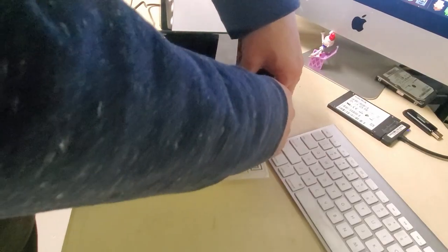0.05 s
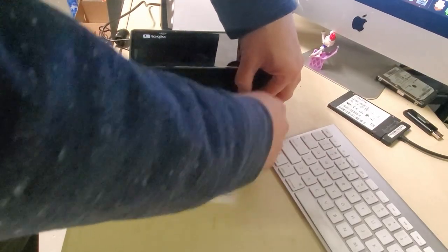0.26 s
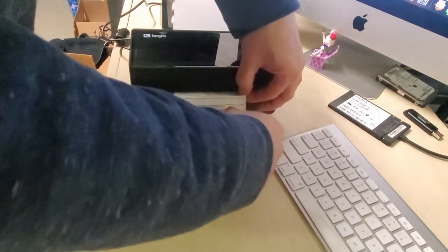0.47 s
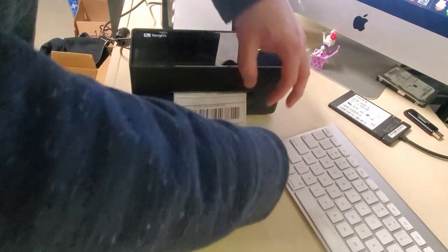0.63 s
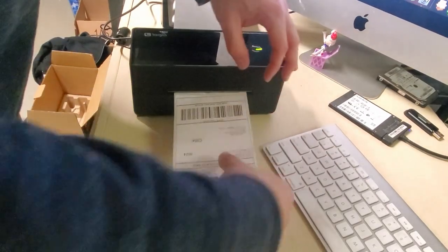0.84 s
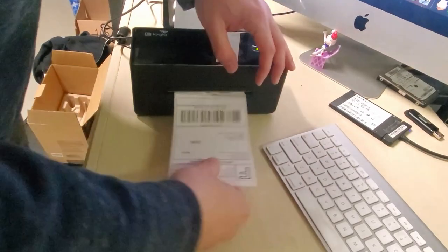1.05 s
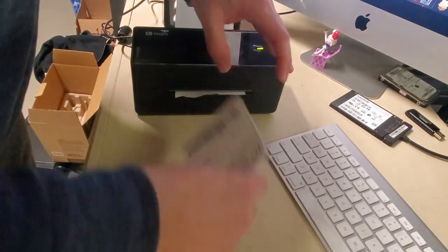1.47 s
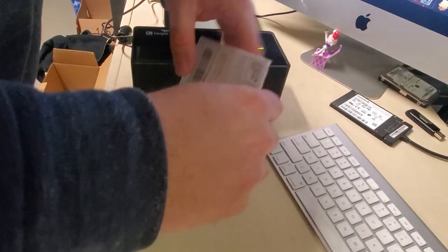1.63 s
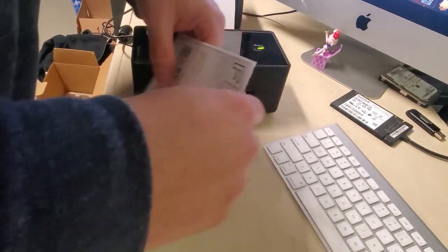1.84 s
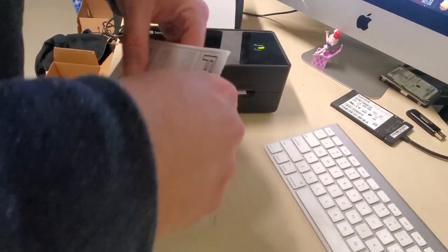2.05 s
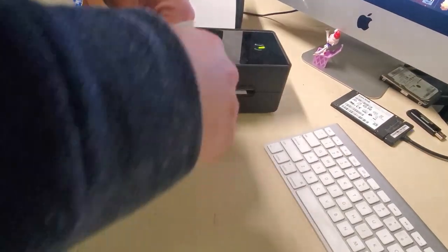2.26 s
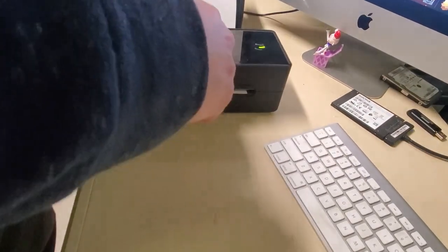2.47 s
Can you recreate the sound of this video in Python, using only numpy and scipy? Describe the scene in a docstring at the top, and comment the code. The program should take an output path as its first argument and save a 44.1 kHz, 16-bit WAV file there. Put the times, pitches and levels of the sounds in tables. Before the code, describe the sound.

A paper label rips off a desk printer, then crinkles and tears free with light knocks.

```python
"""A small office, the microphone close to a desk printer as a paper label is torn off.
The perforation gives way in a quick run of snaps and a short rip of parting fibres; the sheet is
pulled taut, ticks as it buckles, and the last strip rips free. Fingers bump the hollow housing,
the printer rocks, and the paper slides and crinkles as it is lifted, over a faint ventilation hum."""
import sys
import numpy as np
from scipy import signal
from scipy.fft import rfft, irfft
from scipy.io import wavfile

SR = 44100
rng = np.random.default_rng(int(sys.argv[2]) if len(sys.argv) > 2 else 0)


def transcribe(signal):
    """Save signal, clipped to [-1, 1], as a 16-bit WAV file at the path in sys.argv[1]."""
    frames = np.atleast_2d(signal).T
    limited = np.clip(frames, -1, 1)
    pcm = np.round(limited * 32767).astype(np.int16)
    wavfile.write(sys.argv[1], SR, pcm)


N = 110250
T = np.arange(N) / SR


def amp(db):
    """Decibels to gain."""
    return 10 ** (np.asarray(db) / 20)


def unit_rms(x):
    """Scale to rms 1."""
    return x / np.sqrt(np.mean(x ** 2))


def unit_energy(x):
    """Scale each channel to energy 1."""
    return x / np.linalg.norm(x, axis=-1, keepdims=True)


def value_at(points, hz):
    """Value of a table on a log-frequency axis."""
    freqs, values = np.array(sorted(points)).T
    return np.interp(np.log(np.maximum(hz, 1)), np.log(freqs), values)


def convolve(x, response):
    """Play x through a response."""
    return signal.fftconvolve(np.atleast_2d(x), np.atleast_2d(response), axes=-1)[:, :N]


def strike(x, response):
    """Ring a response with unit power gain."""
    return convolve(x, unit_energy(response))


def colour(x, spectrum, size=8192):
    """Minimum-phase filter with the given spectrum and unit power gain."""
    cepstrum = irfft(np.log(amp(value_at(spectrum, np.fft.rfftfreq(size, 1 / SR)))))
    cepstrum[1:size // 2] *= 2
    cepstrum[size // 2 + 1:] = 0
    return strike(x, irfft(np.exp(rfft(cepstrum))))


def decay(t, t60):
    """Fall by 60 dB in t60 seconds."""
    return np.exp(-np.log(1000) * t / t60)


def mode(hz, t60):
    """A dying ring."""
    t = T[:SR // 8]
    return np.cos(2 * np.pi * hz * t) * decay(t, t60)


def clicks(times, db):
    """Impulses, each with the energy of one millisecond at its level."""
    out = np.zeros(N)
    np.add.at(out, np.clip((times * SR).astype(int), 0, N - 1), amp(db) * np.sqrt(SR / 1000))
    return out


def grains(per_s, spread_db):
    """Dense random clicks of uneven size, rms 1."""
    fires = rng.random(N) < per_s / SR
    size = np.minimum(rng.exponential(size=N), 4)
    sign = rng.choice([-1, 1], N)
    return unit_rms(fires * sign * amp(spread_db * size))


def swells(rows):
    """Bell-shaped rises and falls in level."""
    return sum(amp(db) * np.exp(-((T - at) / half) ** 2 / 2) for at, half, db in rows)


def pan(db):
    """Channel gains that put the left db above the right."""
    return amp(np.array([[1], [-1]]) * db / 2)


# sound scattered by the desk, against the direct path: frequency_hz, level_db
DESK_SCATTER = [(100, -12), (1000, -17.5), (2500, -4), (5000, 3.5), (9000, 7), (16000, 8.5)]
# the office's reverberation: frequency_hz, t60_s
ROOM_DECAY = [(100, 0.65), (500, 0.3), (1500, .34), (5000, 0.3), (16000, 0.18)]
def office(x, desk_db, room_db):
    """The way to the microphone: direct sound, treble off the desk, near walls, the room's tail."""
    t, hz = T[:N // 2], np.fft.rfftfreq(N // 2, 1 / SR)

    def reflections(decay_s):
        return unit_energy(rng.standard_normal((2, len(t))) * np.exp(-t / decay_s) * np.sqrt(t))

    direct = np.exp(-2j * np.pi * hz * np.array([[0], [2]]) / SR)  # right channel 2 samples late
    share = amp(value_at(DESK_SCATTER, hz) + desk_db)
    desk = share * rfft(reflections(decay_s=0.0012))
    near = irfft((direct + desk) / np.hypot(1, share), len(t)) * (t < t[-1] / 2)
    noise = rfft(rng.standard_normal((2, len(t))))
    octave = np.round(np.log2(np.maximum(hz, 64)))
    tail = sum(irfft(noise * (octave == k), len(t)) * decay(t, value_at(ROOM_DECAY, 2 ** k))
               for k in np.unique(octave))
    tail = unit_energy(tail * (1 - np.exp(-(t / 0.014) ** 2)))  # builds over 14 ms
    walls = amp(-9) * reflections(decay_s=0.0076)
    return convolve(x, near + walls + amp(room_db) * tail)


# room tone around the microphone: frequency_hz, level_db
HUM_SPECTRUM = [(25, -27.5), (48, 5), (92, -3), (127, -3.5), (153, -10.5), (256, -1), (293, -10.5),
                (439, -13), (476, -20), (641, -18.5), (962, -32), (2050, -38.5), (3820, -37.5),
                (4250, -24.5), (5000, -37), (6050, -31.5), (9320, -48.5), (16000, -36)]
def room_hum():
    """Low ventilation rumble, alike in both channels, under a faint wide hiss."""
    mid, side = colour(rng.standard_normal((2, N)), HUM_SPECTRUM)
    width_db = value_at([(150, -14), (2000, 1)], np.fft.rfftfreq(N, 1 / SR))
    side = irfft(rfft(side) * amp(width_db), N)
    return amp(-63) * np.array([mid + side, mid - side]) * pan(db=2.5)


# the printer rocking on the desk: start_s, relative_level_db, pitch_hz
WOBBLES = [(.01, -54, 70.06), (0.129, -53, 72.04), (0.253, -45.5, 80.64), (0.356, -47.5, 76.5),
           (1.284, -47, 66)]
def printer_rocking():
    """The printer wobbles with a low thump when the pull changes."""
    out = np.zeros(N)
    for at, db, hz in WOBBLES:
        age = np.maximum(T - at, 0)
        attack = 1 - np.exp(-age / 0.0075)
        out += amp(db) * np.sin(2 * np.pi * hz * age) * attack * decay(age, t60=0.3)
    return 2 * out


# paper sliding and a sleeve shuffling by the microphone: middle_s, half_length_s, level_db
PAPER_SLIDES = [(.51, 0.064, -63.5), (1.14, 0.049, -64.5), (1.48, 0.075, -69), (1.745, 0.021, -64)]
SLEEVE_SHUFFLES = [(.03, .07, -57), (.14, .03, -57), (.214, .014, -50), (2.32, .06, -65)]
# tone of the sliding paper, the passing label and the sleeve: frequency_hz, level_db
SLIDE_SPECTRUM = [(200, -12), (1000, -0.5), (3000, -3.5), (5000, -4), (8000, -16), (13000, -8.5)]
SWISH_SPECTRUM = [(300, -3.5), (1300, -18), (1700, -2.5), (1830, -11), (2000, 3.5), (2800, -34),
                  (3850, -5.5), (4700, -30), (16000, -60.5)]
SLEEVE_SPECTRUM = [(40, -10), (90, 5), (200, -0.5), (480, -2.5), (900, -13.5), (1300, -20.5), (2800, -26),
                   (7000, -39.5), (16000, -45)]
def handling():
    """Grainy friction: the sleeve shuffles, paper slides and the freed label swishes past."""
    slide = colour(swells(PAPER_SLIDES) * grains(per_s=3600, spread_db=-2.5), SLIDE_SPECTRUM)
    label_passing = swells([(1.629, 0.037, -61)])
    swish = colour(label_passing * grains(per_s=8700, spread_db=5), SWISH_SPECTRUM)
    sleeve = colour(swells(SLEEVE_SHUFFLES) * grains(per_s=1100, spread_db=1), SLEEVE_SPECTRUM)
    return office((slide + swish + sleeve) * pan(db=3), desk_db=-1.5, room_db=-8)


# soft bumps on the printer: start_s, level_db, thud_offset_db, contact_offset_db, pitch_hz, t60_s
BUMPS = [(.071, -56.5, 0.5, -5, 800, 0.0082), (.157, -60, 4, -14.5, 645, 0.024),
         (.186, -53, 14.5, -4, 850, 0.0075), (.229, -43.5, 8.5, -2.5, 1400, .006),
         (.477, -47, -5.5, -14, 878, 0.0093), (0.5342, -46, -21, -2, 1116, 0.026),
         (.555, -43.5, -19.5, -8.5, 980, .04), (1.16, -47, -17, -7.5, 2187, 0.0094),
         (1.17, -41, -11, -11, 1500, 0.0055), (1.175, -43.5, -4.5, -2.5, 1146, 0.0055),
         (1.2137, -35.5, -26, 0, 1280, 0.0058), (1.2347, -37.5, -11, -4, 1150, 0.011),
         (1.271, -30, -3, -19, 1963, 0.0064), (1.283, -40.5, 4, -3, 496, 0.0096),
         (1.4355, -58, -10, 0.5, 1214, 0.012), (2.249, -62.5, 4.5, 0, 1490, 0.0052),
         (2.308, -49.5, -2.5, -18, 740, 0.027), (2.3846, -38, -2, 0.5, 1433, 0.0053)]
# tone of the contact and of the thud: frequency_hz, level_db
CONTACT_SPECTRUM = [(100, -22), (1200, -8), (4500, -18.5), (14000, -30)]
THUD_SPECTRUM = [(60, -8), (250, -3.5), (450, -0.5), (750, 0.5), (1200, -9.5), (3000, -33.5),
                 (16000, -50.5)]
def housing_knocks():
    """Paper and fingers bump the housing: a tick, a thud and a hollow ring pitched by the spot hit."""
    at, db, thud_db, contact_db, hz, t60 = np.array(BUMPS).T
    rings = sum(strike(clicks(at[[k]], db[[k]]), mode(hz[k], t60[k])) for k in range(len(at)))
    rings = signal.sosfilt(signal.butter(2, [300, 3000], "band", fs=SR, output="sos"), rings)
    contacts = colour(clicks(at, db + contact_db), CONTACT_SPECTRUM)
    thuds = colour(clicks(at, db + thud_db), THUD_SPECTRUM)
    return office((rings + contacts + thuds) * pan(db=3), desk_db=1.5, room_db=-15.5)


# perforation ties breaking, close up: start_s, level_db, crack_offset_db, pitch_hz
TIE_SNAPS = [(0.2401, -17.5, 3.5, 1550), (0.2417, -15.5, -4.5, 1450), (0.2432, -14.5, -11.5, 2800),
             (0.2455, -15.5, -13.5, 2300), (0.2459, -11, -11.5, 2050), (0.2483, -12, -14, 1500),
             (.249, -13, -13, 1800), (.2506, -16, -18.5, 1500), (.255, -10, -12.5, 1800),
             (0.2616, -14, -15, 1650), (0.2661, -16, -17.5, 1430), (.27, -13.5, -12, 1330),
             (0.2752, -14.5, -14, 1210), (0.2793, -13, -14, 1090), (0.2845, -16, -16, 1020),
             (0.2848, -15, -12, 1000), (.2891, -18, -16, 1450), (0.2929, -13, -11.5, 1580)]
# tone of the flexing sheet and the cracking fibres: frequency_hz, level_db
FLEX_SPECTRUM = [(60, -29.5), (200, -12.5), (500, -8), (800, -1.5), (1250, -1.5), (2000, -6.5),
                 (3300, -4.5), (4500, -12.5), (8000, -30.5), (16000, -42.5)]
CRACK_SPECTRUM = [(200, -25), (1500, -7.5), (4000, -4), (6000, 7), (7700, -12), (9000, -8), (12000, -8),
                  (16000, -8.5)]
# resonances of the printer housing: pitch_hz, t60_s, level_db
HOUSING_MODES = [(220, .2, -18), (440, .1, -9), (600, .1, -7), (803, .1, -3), (945, .07, 0), (1123, .08, 0),
                 (1330, .06, 0), (1672, .06, -1), (1840, .08, 1), (2178, .07, -1), (2990, .06, -4)]
def perforation():
    """Each tie snaps: the sheet pops, mostly lower as it comes free, fibres crack, the housing rings."""
    at, db, crack_db, hz = np.array(TIE_SNAPS).T
    t60 = 0.017 * (1100 / hz) ** 2  # the freer, lower sheet rings longer
    pulls = -clicks(at, db)
    pops = sum(strike(-clicks(at[[k]], db[[k]]), mode(hz[k], t60[k])) for k in range(len(at)))
    flex = colour(pulls, FLEX_SPECTRUM)
    housing = sum(amp(level) * mode(pitch, ring_s) for pitch, ring_s, level in HOUSING_MODES)
    body = amp(-1.5) * pops + amp(-9) * flex + amp(-15) * strike(pulls, housing)
    cracks = colour(clicks(at, db + crack_db), CRACK_SPECTRUM)
    return (office(body * pan(db=2.5), desk_db=-3, room_db=-17.5)
            + office(cracks * pan(db=-2.5), desk_db=-5.5, room_db=-13))


def stick_slip(rate_hz, jitter, depth):
    """The tear catches and slips a few milliseconds apart, unevenly."""
    slip_times = np.cumsum(np.exp(jitter * rng.standard_normal(N // 100))) / rate_hz
    cycles = np.interp(T, slip_times, np.arange(len(slip_times)))
    return unit_rms(1 + depth * np.cos(2 * np.pi * cycles))


# runs of the tear, close up: start_s, length_s, start_level_db, end_level_db, rasp_offset_db
TEARS = [(0.253, 0.055, -35.5, -30.5, -12), (.307, .0045, -26.5, -30, -4), (0.3183, 0.0065, -29, -26, -1),
         (0.327, .0095, -33.5, -30, 1.5), (0.339, .0085, -32.5, -32, -2), (0.3545, .0045, -33, -30.5, -2),
         (0.364, 0.0038, -39, -33.5, -9), (1.2351, 0.047, -37, -31.5, -12)]
# tone of the parting fibres and the torn edge: frequency_hz, level_db
FIBRE_SPECTRUM = [(60, -4), (250, -5.5), (550, 3), (1000, -0.5), (2100, 3), (3200, -3.5), (4500, -1.5),
                  (6000, -10.5), (7700, -11.5), (10000, -4.5), (16000, -7.5)]
EDGE_SPECTRUM = [(500, -33), (3300, -15.5), (4300, -2), (4900, -3), (5500, -11), (7000, -12.5),
                 (8000, -23.5), (14000, -22.5)]
def rips(attack_s=0.0012, release_s=0.00036, fibres_per_s=6500):
    """Fibres part in a dense crackle while the tear runs; the torn edge rasps."""
    fibre_level, edge_level = np.zeros((2, N))
    for at, length, start_db, end_db, rasp_db in TEARS:
        attack = np.clip((T - at) / attack_s, 0, 1)
        release = np.exp(-np.maximum(T - at - length, 0) / release_s)
        force = amp(np.interp(T, [at, at + length], [start_db, end_db])) * attack * release
        fibre_level += force
        edge_level += force * amp(rasp_db)
    slip = stick_slip(rate_hz=260, jitter=0.3, depth=0.85)
    fibres = colour(slip * fibre_level * grains(fibres_per_s, spread_db=4), FIBRE_SPECTRUM)
    rasp = colour(slip * edge_level * grains(fibres_per_s, spread_db=4), EDGE_SPECTRUM)
    return office((fibres + rasp) * pan(db=0.5), desk_db=4, room_db=-18.5)


# the torn edge catching, centred on the microphone: start_s, level_db
EDGE_CATCHES = [(0.4221, -39), (0.5348, -43), (1.4348, -53), (1.95, -64.5), (2.198, -62)]
def edge_flicks():
    """The torn edge flicks past a finger with a thin, high tick."""
    at, db = np.array(EDGE_CATCHES).T
    return office(colour(clicks(at, db), EDGE_SPECTRUM), desk_db=9, room_db=-18)


# the sheet creasing, mostly left of centre: start_s, level_db, pop_offset_db, left_over_right_db
CREASES = [(.5336, -48, -3, 1), (1.079, -40, -16, 4), (1.08, -38.5, -14.5, 3), (1.1007, -32, 0.5, 0.5),
           (1.102, -43, -2, 10), (1.1591, -53.5, 1, -1), (1.2784, -26, -7, 1), (1.7221, -69, 6, -3),
           (1.7439, -67, 14.5, 5), (2.366, -43.5, -4, 4.5), (2.384, -41.5, 4.5, 3)]
# tone of a crease's tick and of its pop: frequency_hz, level_db
TICK_SPECTRUM = [(200, -32), (1000, -9.5), (2300, -9), (4200, 3.5), (6500, 3.5), (8500, -5), (11300, 3.5),
                 (13400, 3.5), (16000, -4)]
POP_SPECTRUM = [(100, -15), (900, -9.5), (1500, 1), (2150, 6), (2650, -7), (3150, 11.5), (3700, 5.5),
                (16000, -23.5)]
def crease_ticks():
    """The sheet buckles with a bright tick and a duller pop."""
    at, db, pop_db, pan_db = np.array(CREASES).T
    channels = []
    for side_db in (db + pan_db / 2, db - pan_db / 2):
        ticks = colour(clicks(at, side_db), TICK_SPECTRUM)
        pops = colour(clicks(at, side_db + pop_db), POP_SPECTRUM)
        channels.append(ticks + pops)
    return office(np.vstack(channels), desk_db=9.5, room_db=-14.5)


def scene():
    """Everything that reaches the microphone at the desk."""
    paper = perforation() + rips() + crease_ticks() + edge_flicks()
    return paper + housing_knocks() + handling() + printer_rocking() + room_hum()


def record(dry):
    """The recorder cuts the bass below 42 Hz and the treble above 15.9 kHz."""
    low_cut = signal.butter(4, 42, "high", fs=SR, output="sos")
    high_cut = signal.ellip(10, 0.2, 80, 15900, fs=SR, output="sos")
    return signal.sosfilt(high_cut, signal.sosfilt(low_cut, dry))


dry = scene()
out = record(dry)
transcribe(out)
```